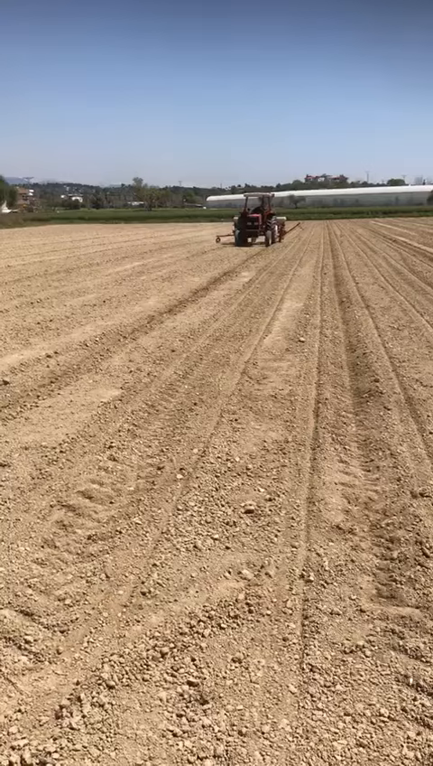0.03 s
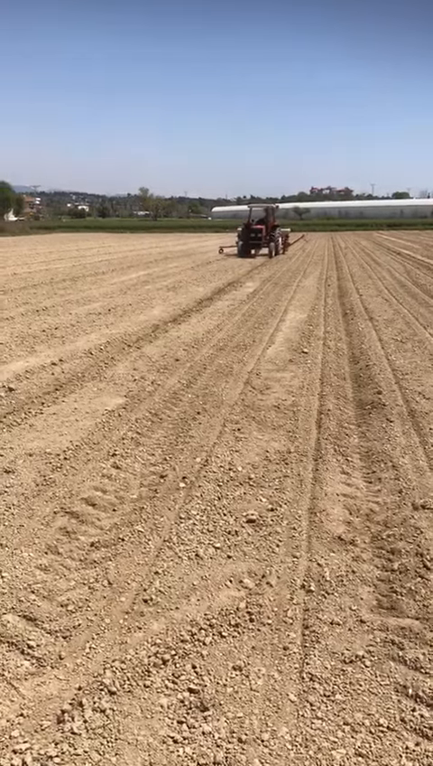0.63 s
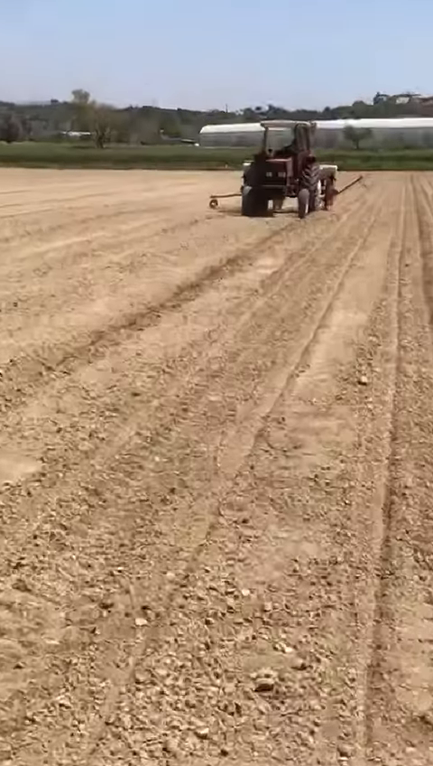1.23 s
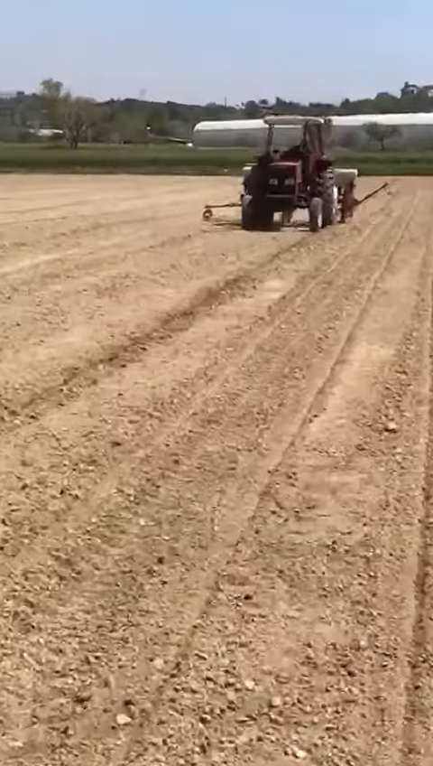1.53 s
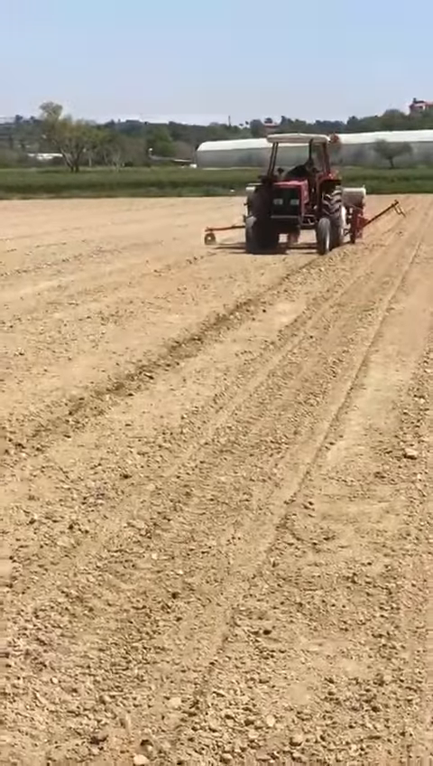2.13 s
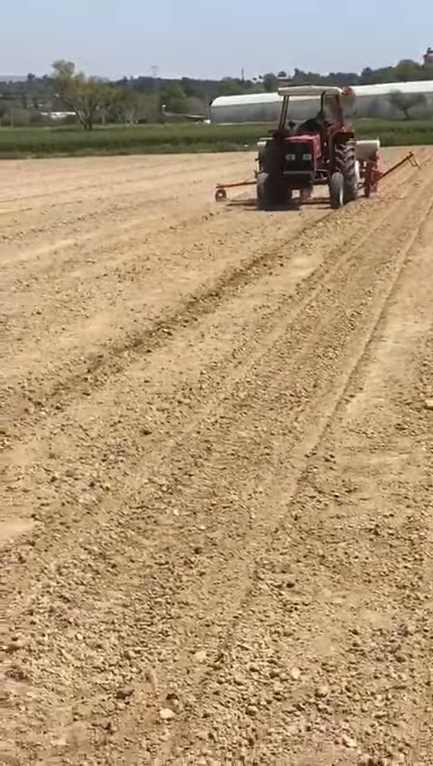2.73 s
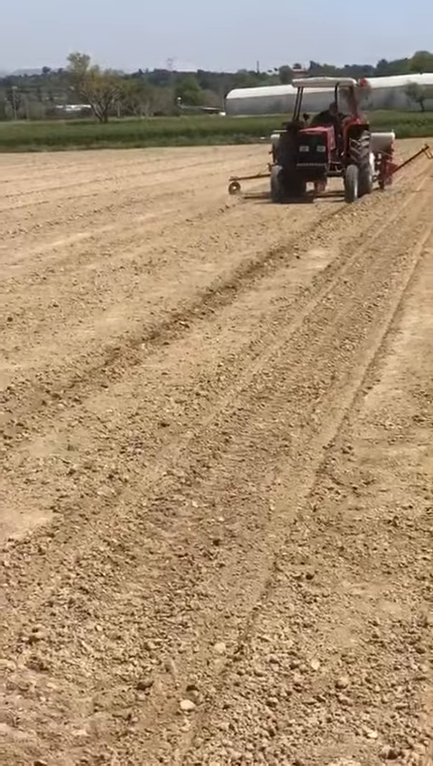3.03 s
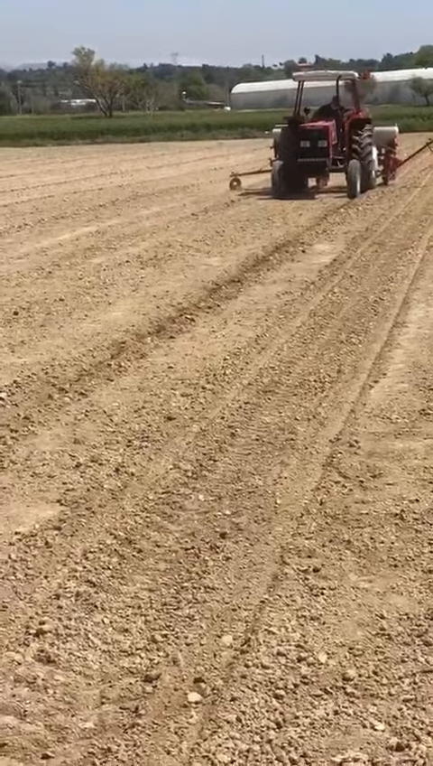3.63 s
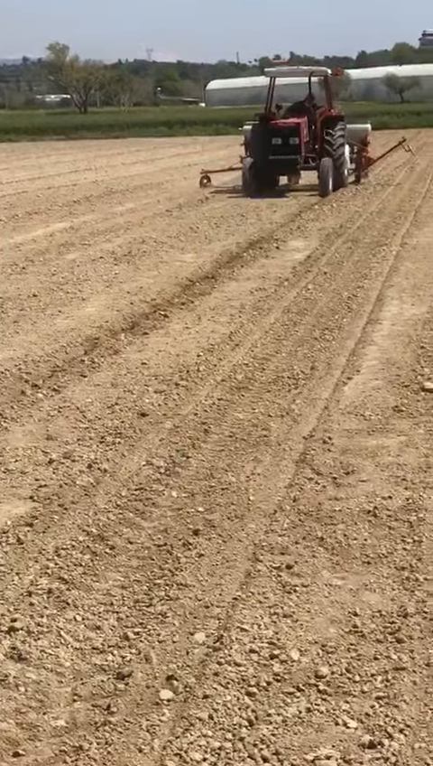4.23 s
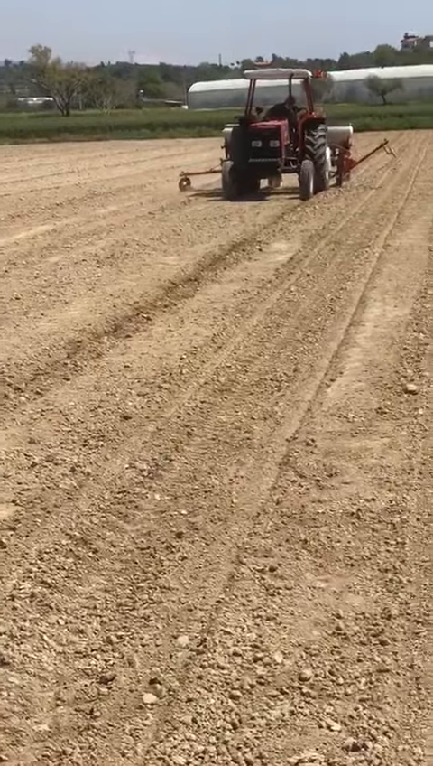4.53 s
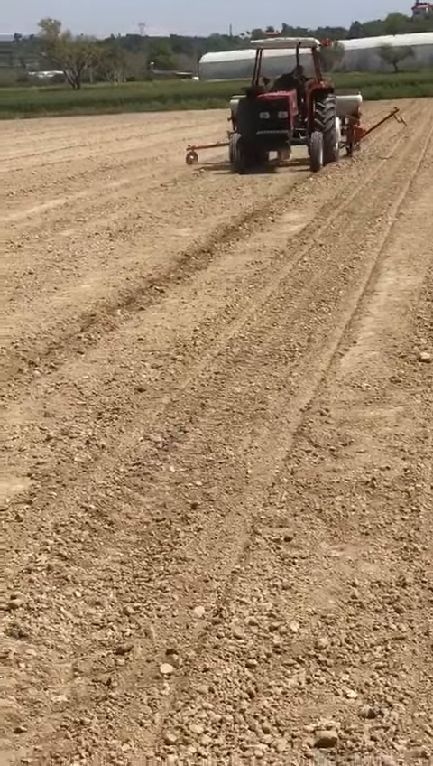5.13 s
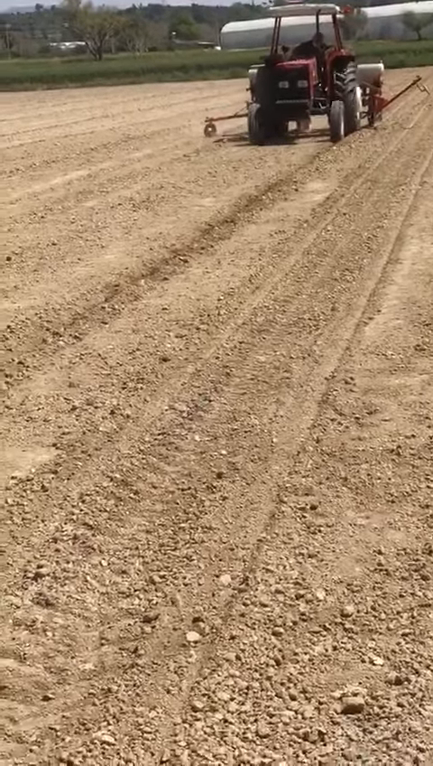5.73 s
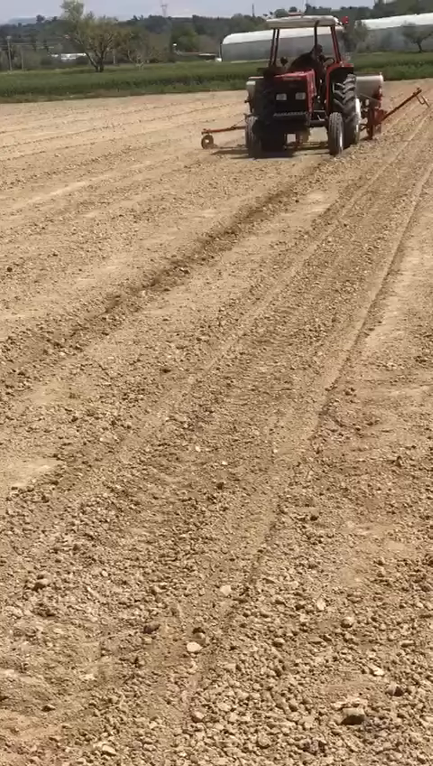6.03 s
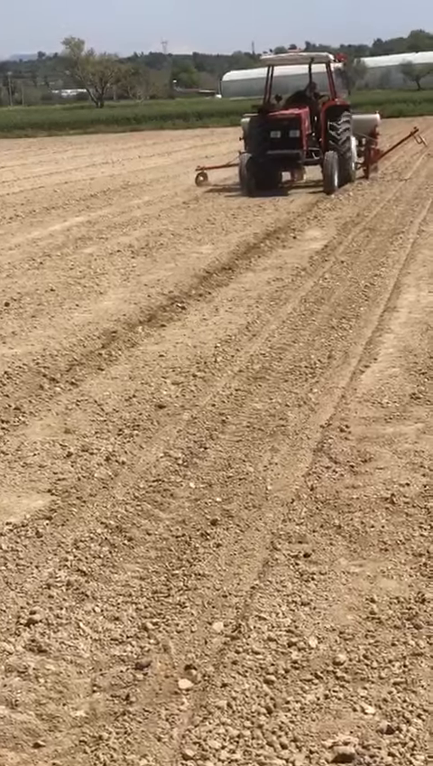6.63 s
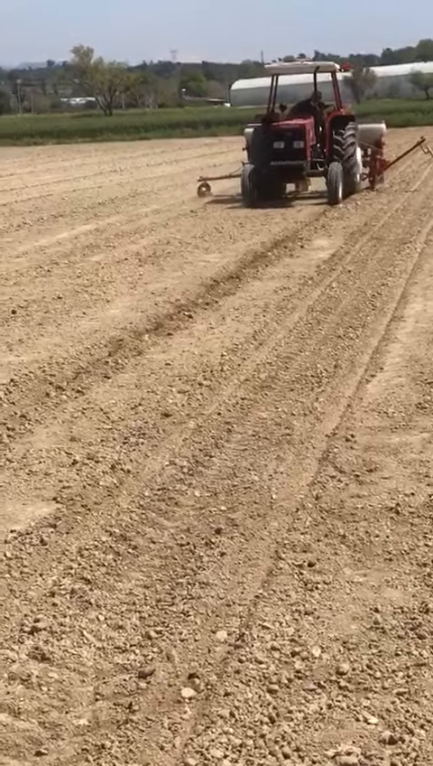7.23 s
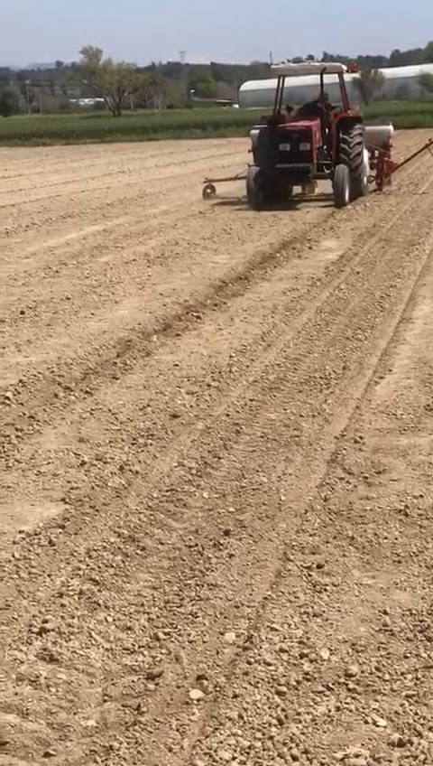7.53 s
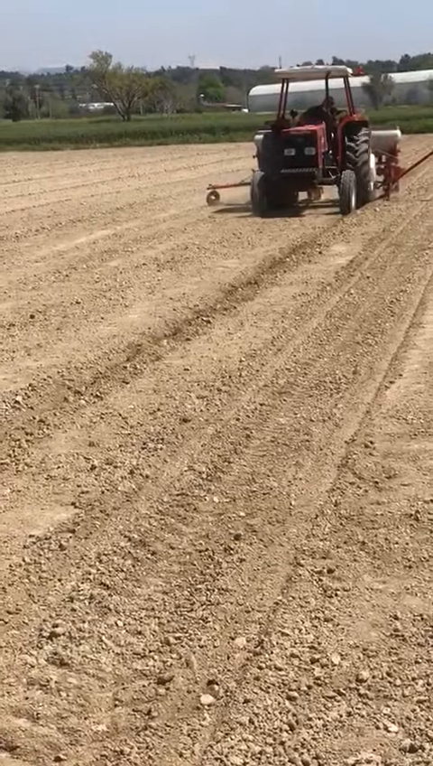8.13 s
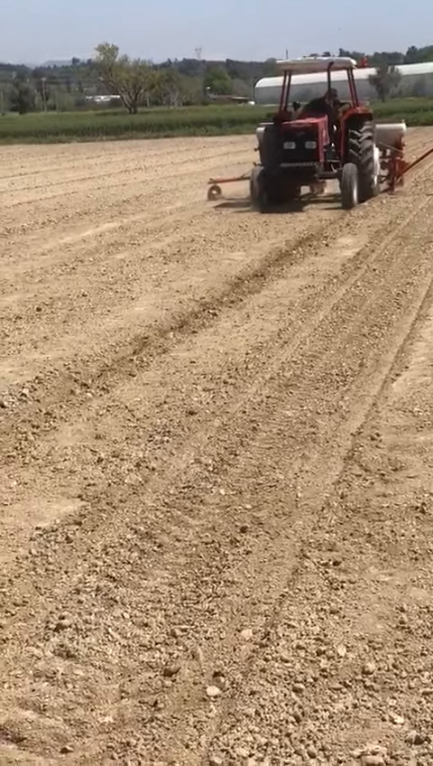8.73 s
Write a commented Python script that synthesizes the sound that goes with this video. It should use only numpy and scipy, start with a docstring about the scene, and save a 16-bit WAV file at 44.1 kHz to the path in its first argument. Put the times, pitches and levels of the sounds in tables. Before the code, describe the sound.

Out on open ground, a distant tractor engine drones evenly with a metallic diesel rattle, joined by the hum of a seed planter's fan and the soft hiss of soil under its tools. Gusts hit the microphone in irregular rumbles and short slaps, light at first and heaviest in the second half, while the machine keeps running underneath without a break.

```python
"""Tractor planting in a windy field

A four-cylinder diesel tractor creeps closer over open ground, pulling a seed planter. Its firings
throb and clatter, its gears whine, the planter's belt-driven fan hums, soil hisses under the tools
and one stone clinks. Gusts buffet the single microphone with rumble, flutter, slaps and pops."""
import sys
import numpy as np
from scipy import signal
from scipy.fft import rfft, irfft, next_fast_len
from scipy.io import wavfile
from scipy.ndimage import uniform_filter1d, map_coordinates

SR = 44100
rng = np.random.default_rng(int(sys.argv[2]) if len(sys.argv) > 2 else 0)


def int16_out(signal):
    """Quantize to a 16-bit WAV file."""
    q = np.round(np.clip(np.atleast_2d(signal).T, -1, 1) * 32767)
    wavfile.write(sys.argv[1], SR, q.astype(np.int16))


N = 396018
TIME = np.arange(N) / SR


def amp(db):
    """Decibels to gain."""
    return 10 ** (np.asarray(db) / 20)


def unit(x):
    """Scale to rms 1."""
    return x / np.sqrt(np.mean(x ** 2) + 1e-20)


def curves(rows):
    """One value per sample for each column after the time."""
    times, *columns = np.transpose(rows)
    return [np.interp(TIME, times, column) for column in columns]


def wobble(rate):
    """A smooth random curve, rate knots a second."""
    return map_coordinates(rng.standard_normal(int(N * rate / SR) + 4), [TIME * rate])


def filtered(x, response):
    """x through a response given as a function of frequency."""
    size = next_fast_len(len(x) + 8192)
    return irfft(rfft(x, size) * response(np.fft.rfftfreq(size, 1 / SR)), size)[:len(x)]


def coloured(x, points):
    """x through a (Hz, dB) spectrum read on a log axis, at rms 1."""
    f, db = np.transpose(points)
    return unit(filtered(x, lambda hz: amp(np.interp(np.log(hz + 1), np.log(f), db))))


def tone(turns):
    """A sine of rms 1 at a phase counted in turns."""
    return np.sqrt(2) * np.sin(2 * np.pi * turns)


def knocks(firings, decay, rest, uneven):
    """Envelope that jumps at each firing and decays; the second half of the cycle hits harder."""
    since = firings % 1
    return (rest + np.exp(-since / decay)) * (1 - uneven * np.sin(np.pi * firings / 2))


def cycle_pattern(firings, size=3000):
    """A random rattle that returns alike every four firings, as the same parts meet again."""
    pattern = irfft(np.exp(2j * np.pi * rng.random(size // 2 + 1)), size)
    return unit(map_coordinates(pattern, [firings / 4 % 1 * size], mode="grid-wrap"))


# The exhaust from across the field. Each row: multiple of the firing rate, typical level in dB.
EXHAUST_ORDERS = [(1, -35.5), (2, -41), (3, -77), (4, -66), (5, -59.5)]
def exhaust(firings, carry_db):
    """The firings throb in low harmonics, swelling a little as the tractor nears."""
    note = sum(amp(db + 0.43 * wobble(6)) * tone(order * firings) for order, db in EXHAUST_ORDERS)
    return note * amp(1.65 * carry_db)


# Resonances of the engine's covers. Each row: pitch in Hz, width in Hz, gain in dB.
COVER_MODES = [(2000, 20, -5), (2061, 16, 8), (2658, 10, 11), (2760, 17, 5.5)]
def covers(hz):
    """Response of sheet metal that rings at its own pitches whatever the engine speed."""
    return sum(amp(db) * 1j * hz * width / (f * f - hz * hz + 1j * hz * width)
               for f, width, db in COVER_MODES)


# The ring of block and panels. Each row: frequency in Hz, relative level in dB.
BLOCK_SPECTRUM = [(300, -15.5), (1020, -5), (1160, 5), (1300, -2), (1420, 0.5), (1560, -3), (1660, -0.5),
                  (1900, -14.5), (2070, -2), (2350, -4.5), (2680, -4.5), (3050, -13.5), (3300, -9),
                  (3450, -17), (4000, -12.5), (4700, -33.5)]
def clatter(firings):
    """Diesel knock in the block, part alike every cycle and part new; it also shakes the covers."""
    repeating = cycle_pattern(firings + 0.0016 * wobble(12))
    repeating *= knocks(firings, decay=0.15, rest=1.0, uneven=0.065)
    fresh = rng.standard_normal(N) * knocks(firings, decay=0.44, rest=1.7, uneven=0.037)
    block = unit(coloured(repeating, BLOCK_SPECTRUM) + 0.96 * coloured(fresh, BLOCK_SPECTRUM))
    shaking = rng.standard_normal(N) * knocks(firings, decay=0.33, rest=0.53, uneven=0.48)
    return amp(-1.87) * block + amp(-11) * unit(filtered(shaking, covers))


# Struck engine parts. Each row: place in the cycle in firings (0-4), pitch in Hz,
# relative level in dB, swell time in seconds.
STRUCK_PARTS = [(0.0, 2320, 1, 0.0012), (0.33, 2496, 0.5, 0.0012), (1.349, 2086, 2, 0.0013),
                (2.001, 2057, 0.5, 0.0017), (2.11, 2682, 4, 0.0015), (2.16, 2860, -4, 0.001),
                (2.297, 1180, -8, 0.0011), (2.68, 1325, -2, 0.0038), (2.95, 1785, -1.5, 0.0014),
                (3.13, 2670, 0.5, 0.0013), (3.152, 3710, -7, 0.0016), (3.33, 3287, -6.5, 0.0025),
                (3.662, 1236, 2, 0.0018)]
def ringing_parts(firings, speed):
    """Valves, injectors and pistons set their own part ringing at the same place in every cycle."""
    out = np.zeros(N)
    for place, hz, db, swell_s in STRUCK_PARTS:
        cycle, since = np.divmod(firings - place + 4, 4)
        age = since / speed
        force_db = rng.standard_normal(200)[cycle.astype(int)]
        envelope = age / swell_s * np.exp(1 - age / swell_s)
        out += amp(db + force_db) * envelope * tone(hz * age + 0.048 * wobble(30))
    return out


# The three main gear tones, as multiples of the firing rate.
MAIN_GEAR_ORDERS = [24, 25, 27]
# How they reach the microphone, shifting with load and moving air.
# Each row: time in seconds, then the relative level of each tone in dB.
MAIN_GEAR_LEVELS = [(0.2, -43, -54, -48), (1.05, -41, -65, -60), (1.45, -38.5, -43, -43),
                    (1.82, -35.5, -36, -46), (2.3, -38, -45, -45), (3.0, -42, -50, -49),
                    (3.25, -41.5, -42, -45), (3.5, -38, -36.5, -45), (3.9, -41.5, -47, -49),
                    (4.25, -37.5, -38, -41.5), (4.9, -41.5, -49, -51), (5.28, -39.5, -38.5, -45),
                    (5.68, -38.5, -48, -58.5), (5.95, -37.5, -43, -51), (6.4, -36, -36, -48),
                    (7.15, -40, -45, -46), (7.75, -38, -38.5, -42.5), (8.1, -40.5, -39.5, -40.5),
                    (8.4, -40, -43.0, -46), (8.78, -38, -39, -39)]
# Weaker gear tones: multiples of the firing rate, then their typical levels in dB.
WEAK_GEAR_ORDERS = [13, 16, 18.75, 19, 20, 21, 21.25, 21.75, 22, 23, 24.5, 28]
WEAK_GEAR_DB = [-56, -60, -60.5, -59, -59.5, -54, -55, -51.5, -65.5, -51.5, -56.5, -52]
def gears(firings, carry_db):
    """Gear tones locked to the crank beat together and throb once per four-stroke cycle."""
    throb = 1 + 0.2 * tone((firings - 2.1) / 4)
    mesh = firings - 0.65
    main, weak = np.zeros((2, N))
    for order, db in zip(MAIN_GEAR_ORDERS, curves(MAIN_GEAR_LEVELS)):
        gain = amp(db - 1.33 + wobble(14))
        main += gain * tone(order * mesh + 0.026 * wobble(2.33) + 0.019 * wobble(24))
    for order, db in zip(WEAK_GEAR_ORDERS, WEAK_GEAR_DB):
        gain = amp(db + 2.7 * np.tanh(wobble(2.18)))
        weak += gain * tone(order * mesh + rng.random() + 0.17 * wobble(1.53))
    return throb * (main + amp(carry_db) * weak)


# High engine tones off the covers: multiples of the firing rate, then their relative levels in dB.
COVER_TONE_ORDERS = [34.25, 35.25, 36.25, 38, 39.5, 41.5, 42, 42.5, 43, 45.25, 45.75, 47.25]
COVER_TONE_DB = [-60.5, -63.5, -52.5, -53.5, -58.5, -59.5, -53, -64, -56.5, -61, -58, -62.5]
def cover_tones(firings, speed, carry_db):
    """High orders glide with the engine; each swells if it meets a resonance of the covers."""
    speeds = np.linspace(speed.min(), speed.max(), 64)
    out = np.zeros(N)
    for order, db in zip(COVER_TONE_ORDERS, COVER_TONE_DB):
        lift = np.interp(speed, speeds, np.abs(1 + 0.53 * covers(order * speeds)))
        out += amp(db + 2.1 * wobble(3.46)) * lift * tone(order * firings + rng.random())
    return amp(carry_db) * out


# The fan's blade tone, heard through moving air. Each row: time in seconds, level in dB.
BLADE_LEVELS = [(0.1, -49.5), (0.55, -51), (1.25, -48), (1.55, -46), (1.88, -42), (2.55, -47), (3.28, -48),
                (3.5, -44.5), (3.72, -44.5), (4.0, -46.5), (4.5, -46), (5.2, -47.5), (5.6, -48), (6.3, -44),
                (7.1, -45), (7.75, -45), (8.0, -43), (8.35, -47), (8.9, -43.5)]
# Air ringing in the fan housing. Each row: frequency in Hz, relative level in dB.
HOUSING_SPECTRUM = [(200, -2.5), (480, -9), (580, -1), (640, 5), (700, 1), (765, 8), (830, -0.5), (900, 3),
                    (1000, -11), (1400, -33)]
def fan(speed, carry_db, lag_s=0.099, blades_per_firing=11.765):
    """The planter's fan hums and rushes; its belt passes on the engine's sags, delayed by inertia."""
    blade_hz = blades_per_firing * np.interp(TIME - lag_s, TIME, speed)
    blade_db, = curves(BLADE_LEVELS)
    gain = amp(blade_db + wobble(9))
    hum = gain * tone(np.cumsum(blade_hz) / SR + 0.035 * wobble(24) + 0.053 * wobble(4.02))
    air = amp(-44 + 1.1 * carry_db) * coloured(rng.standard_normal(N), HOUSING_SPECTRUM)
    return hum + air


# Fan air and soil on the planter's tools. Each row: frequency in Hz, relative level in dB.
HISS_SPECTRUM = [(300, -6.5), (1200, 13.5), (3400, 7), (4600, -2), (5300, 0.5), (6100, 1.5), (7400, -6),
                 (9400, -9), (10600, -20.5), (11800, -67)]
def hiss(firings):
    """Air and soil noise, sharpened by the injectors' ticking just after each firing."""
    ticking = knocks(firings - 0.04, decay=0.34, rest=1.6, uneven=0.015)
    return coloured(rng.standard_normal(N) * ticking * amp(0.76 * wobble(30)), HISS_SPECTRUM)


# The engine hunting under its governor. Each row: time in seconds, firings per second.
ENGINE_SPEED = [(0.1, 58.67), (0.34, 58.8), (0.58, 59.29), (1.06, 59.01), (1.18, 59.12), (1.54, 58.53),
                (1.78, 58.31), (2.62, 59.14), (3.1, 58.84), (3.46, 58.29), (3.82, 59.06), (4.06, 58.85),
                (4.3, 58.52), (4.54, 58.8), (4.9, 59.01), (5.26, 58.5), (5.62, 58.14), (5.98, 58.32),
                (6.22, 58.22), (6.58, 58.47), (6.7, 58.46), (6.94, 58.88), (7.18, 59.11), (7.3, 59.09),
                (7.78, 58.58), (7.9, 58.64), (8.14, 58.53), (8.26, 58.74), (8.5, 58.89), (8.98, 58.36)]
# How well the machine carries over the field to the microphone.
# Each row: time in seconds, relative levels of clatter and of hiss in dB.
FIELD_CARRY = [(0.1, -43, -54), (0.64, -39.5, -51), (1.08, -42, -53.5), (1.18, -37, -54.5),
               (1.31, -38.5, -49.5), (2.05, -38.5, -47), (2.29, -38.5, -53.5), (2.51, -40.5, -47.5),
               (2.61, -37.5, -49), (3.28, -41, -52), (3.33, -39.5, -48.5), (3.99, -38.5, -50.5),
               (4.07, -36.5, -50), (4.59, -40.5, -51), (4.76, -40.5, -46.5), (4.83, -38, -53),
               (5.28, -38.5, -48.5), (5.62, -41, -55), (5.95, -40, -52), (6.38, -38, -49.5),
               (6.43, -39.5, -51.5), (7.57, -37, -48.5), (8.5, -39, -50), (8.75, -35, -46.5),
               (8.95, -40, -50)]
def tractor():
    """Tractor and planter at a distance: all turns with the engine and wavers in the moving air."""
    speed, = curves(ENGINE_SPEED)
    firings = np.cumsum(speed) / SR
    clatter_db, hiss_db = curves(FIELD_CARRY)
    carry_db = uniform_filter1d(clatter_db - np.mean(clatter_db), size=SR // 2)
    shimmer = wobble(7)
    metal = amp(1.9) * clatter(firings) + amp(-2.5) * ringing_parts(firings, speed)
    metal *= amp(clatter_db + 0.5 * shimmer)
    air = amp(hiss_db + 9.5 + 0.39 * shimmer) * hiss(firings)
    whine = gears(firings, carry_db) + cover_tones(firings, speed, carry_db)
    return metal + exhaust(firings, carry_db) + whine + fan(speed, carry_db) + air


# The breeze at the microphone between gusts. Each row: time in seconds, rumble level in dB.
BREEZE_LEVELS = [(0.1, -51), (0.9, -39.5), (1.4, -29.5), (2.0, -37), (2.45, -37), (3.7, -31), (4.6, -30),
                 (5.9, -27.5), (7.0, -34.5), (7.4, -38.5), (7.85, -33.5), (8.1, -37), (8.95, -29)]
# Gusts on the microphone. Each row: start and length in seconds, rumble and flutter levels in dB.
MIC_GUSTS = [(0.102, 0.072, -36, -37.5), (1.158, 0.02, -24.5, -33.5), (1.342, 0.092, -24.5, -40),
             (1.475, 0.015, -28, -32), (1.52, 0.053, -37, -40), (1.734, 0.042, -26, -41),
             (2.59, 0.059, -24.5, -40), (2.675, 0.043, -29, -28), (2.77, 0.046, -21, -29.5),
             (2.994, .012, -23, -40), (3.115, 0.019, -40, -30), (3.166, 0.071, -35, -37),
             (3.405, .018, -34, -30), (3.569, 0.03, -24.5, -29), (3.852, 0.031, -34, -31.5),
             (4.339, 0.032, -25, -30.5), (4.397, .03, -23, -28), (4.465, 0.028, -25, -34),
             (4.58, 0.033, -25, -29), (4.65, 0.017, -41, -26.5), (4.96, 0.036, -24, -25.5),
             (5.078, 0.057, -26, -25), (5.238, .025, -26, -24), (5.317, 0.022, -33, -30),
             (5.423, 0.053, -19, -25.5), (5.55, 0.027, -22, -23.5), (5.616, 0.033, -22, -25),
             (5.672, 0.024, -25, -24), (5.747, 0.033, -27, -24), (5.82, 0.05, -28, -23.5),
             (5.904, 0.022, -22.5, -25.5), (6.172, 0.065, -32, -34.5), (6.345, 0.032, -18.5, -31),
             (6.43, 0.097, -22, -26), (6.764, 0.025, -16, -27), (7.017, 0.033, -26, -43),
             (7.094, .02, -22, -37), (7.144, 0.07, -28, -35), (7.99, 0.17, -27.5, -28.5),
             (8.216, 0.015, -35, -29), (8.377, 0.016, -27.5, -36), (8.427, 0.069, -30, -35.5),
             (8.86, 0.024, -25, -26), (8.929, 0.018, -26, -37)]
def gusts(attack_s=0.011, release_s=0.014):
    """Gains of rumble and flutter: each gust rises, holds and dies away over a restless breeze."""
    breeze_db = curves(BREEZE_LEVELS)[0] + 2.7 * wobble(17)
    rumble_power = amp(breeze_db) ** 2
    flutter_power = amp(-41.5 + 0.27 * (breeze_db - np.mean(breeze_db))) ** 2
    for start, length, rumble_db, flutter_db in MIC_GUSTS:
        before, after = np.maximum(start - TIME, 0), np.maximum(TIME - start - length, 0)
        shape = np.exp(-before / attack_s - after / release_s)
        rumble_power += (amp(rumble_db) * shape) ** 2
        flutter_power += (amp(flutter_db) * shape) ** 2
    return np.sqrt(rumble_power), np.sqrt(flutter_power)


def turbulence(spectrum, power_floor):
    """Low noise whose own swells are evened out, so that the gusts set its strength."""
    noise = coloured(rng.standard_normal(N), spectrum)
    power = np.abs(uniform_filter1d(noise ** 2, size=SR // 25))
    return unit(noise / np.sqrt(power + power_floor))


# Two colours of wind right on the microphone. Each row: frequency in Hz, relative level in dB.
RUMBLE_SPECTRUM = [(10, -50), (25, -40), (38, -10), (55, 4), (90, 0), (125, -5), (170, -15), (300, -39),
                   (800, -96)]
FLUTTER_SPECTRUM = [(50, -47), (100, 0.5), (145, 3), (200, -3), (300, -6.5), (420, -18), (600, -30.5),
                    (1000, -39), (3000, -81)]
def wind():
    """Gusts rumble on the microphone, break into lumpy flutter and shed eddies."""
    rumble_gain, flutter_gain = gusts()
    lumps = amp(4.5 * np.tanh(wobble(80)))
    rumble = rumble_gain * turbulence(RUMBLE_SPECTRUM, power_floor=0.32)
    flutter = flutter_gain * unit(turbulence(FLUTTER_SPECTRUM, power_floor=0.097) * lumps)
    return rumble + flutter + eddies(flutter_gain) + port_pops()


# The hardest slaps on the microphone.
# Each row: time in seconds, peak in dB before the low cut, half-width in seconds.
HARD_EDDIES = [(1.061, -27.5, 0.00085), (1.363, -21.5, 0.00086), (1.483, -18, 0.0022), (2.786, -22, .0025),
               (3.132, -27, 0.0016), (3.591, -15, 0.0026), (3.873, -26, 0.0011), (3.975, -21, 0.002),
               (4.355, -15.5, 0.0022), (4.668, -18, 0.0014), (4.972, -19, 0.0017), (5.098, -12.5, 0.0017),
               (5.119, -18.5, 0.001), (5.253, -18.5, 0.0017), (5.447, -10, 0.0038), (5.465, -15, 0.0012),
               (5.565, -16, 0.0017), (5.629, -18, 0.001), (6.128, -12, 0.0015), (6.352, -15, 0.00098),
               (6.378, -9.5, 0.0031), (6.469, -11.5, 0.0015), (6.517, -13.5, 0.0019), (6.781, -17, 0.00085),
               (7.101, -17, 0.0021), (8.022, -18, 0.0019), (8.126, -19.5, 0.0013), (8.153, -19, 0.0024),
               (8.793, -21.5, 0.0013)]
def eddies(flutter_gain, per_second=20, half_width_s=0.0013, low_cut_hz=48):
    """Each passing eddy sucks at the microphone, then slaps back; the low cut adds a rebound."""
    slaps = [(s, amp(db), width) for s, db, width in HARD_EDDIES]
    # Lesser eddies come at random, up to 8 dB over the flutter.
    for when, weakness, breadth in rng.random((int(per_second * N / SR), 3)):
        gain = flutter_gain[int(when * N)] * amp(8 - 8.6 * weakness)
        slaps.append((when * N / SR, gain, half_width_s * 2 ** (breadth - 0.5)))
    out = np.zeros(N)
    for s, gain, width in slaps:
        near = slice(max(int(s * SR) - SR // 20, 0), int(s * SR) + SR // 20)
        u = (TIME[near] - s) / width
        out[near] += gain * 16 / np.sqrt(27) * u / (1 + u * u) ** 2  # peaks at gain
    return signal.sosfilt(signal.butter(2, low_cut_hz, "highpass", fs=SR, output="sos"), out)


# Pops at the microphone. Each row: time in seconds, pitch in Hz, level in dB, half-length in seconds.
PORT_POPS = [(3.129, 394, -36, 0.0076), (5.465, 640, -24.5, 0.0036)]
def port_pops():
    """A hard eddy rings the microphone's port for a few cycles."""
    return sum(amp(db) * np.exp(-((TIME - s) / half) ** 2) * tone(hz * (TIME - s))
               for s, hz, db, half in PORT_POPS)


# A stone out at the planter's tools. Each row: start in seconds, level in dB.
STONE_STRIKES = [(6.337, -31)]
def stone(decay_s=0.0086):
    """A stone meets steel: a short, bright scrape."""
    envelope = sum(amp(db) * (TIME > s) * np.exp(-np.abs(TIME - s) / decay_s) for s, db in STONE_STRIKES)
    steel_spectrum = [(1000, -6), (3200, 15), (6000, -3), (9000, -5), (12000, -25)]
    return envelope * coloured(rng.standard_normal(N), steel_spectrum)


def scene():
    """Open ground gives no echo: just the machine out in the field and the wind on one microphone."""
    return (tractor() + stone() + wind())[None]


def record(dry, opens_s=0.083, top_hz=11750):
    """The microphone opens after a moment and keeps nothing above its band limit."""
    opened = np.clip((TIME - opens_s) / 0.003, 0, 1)
    return np.array([filtered(x * opened, lambda hz: hz < top_hz) for x in dry])


dry = scene()
out = record(dry)
int16_out(out)
```